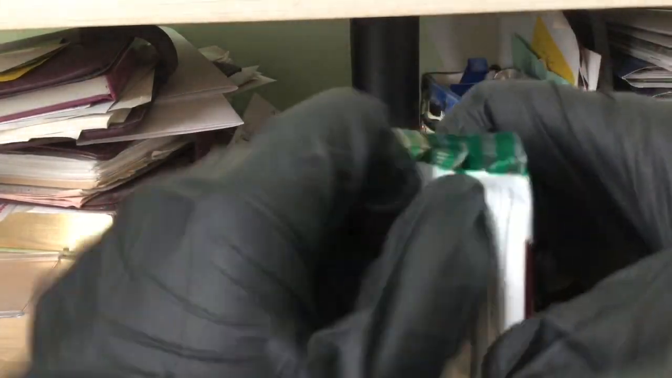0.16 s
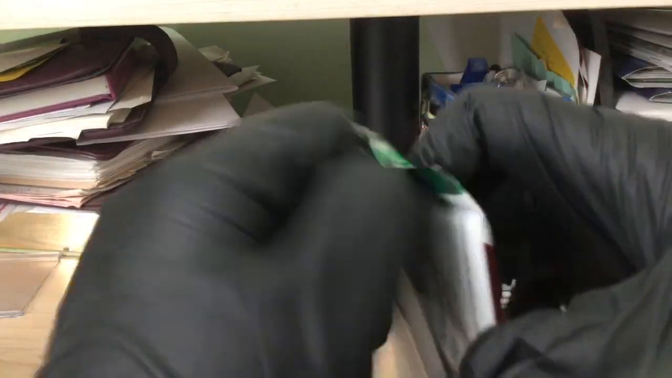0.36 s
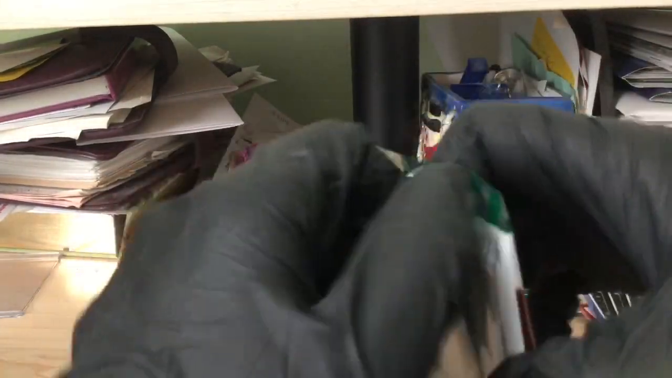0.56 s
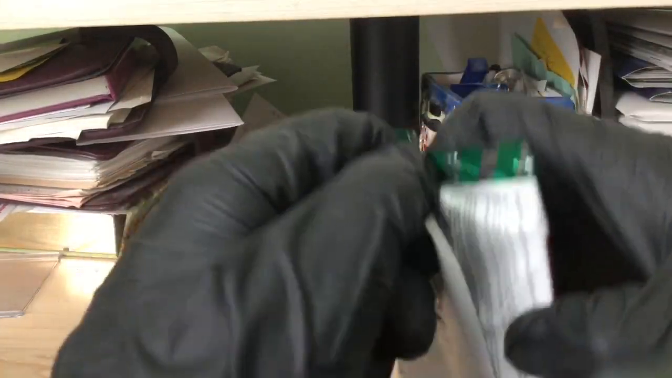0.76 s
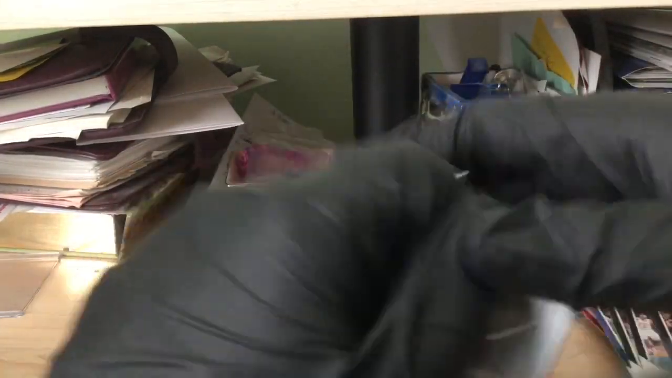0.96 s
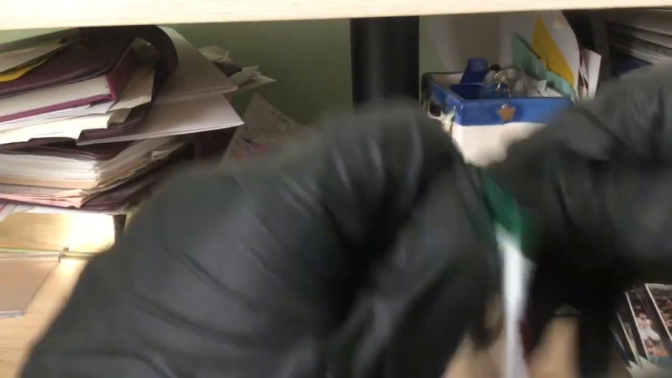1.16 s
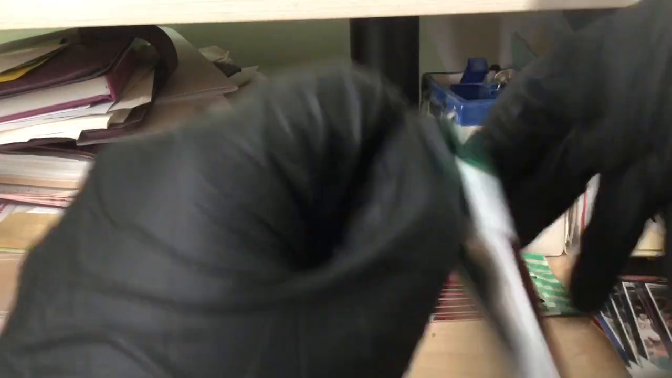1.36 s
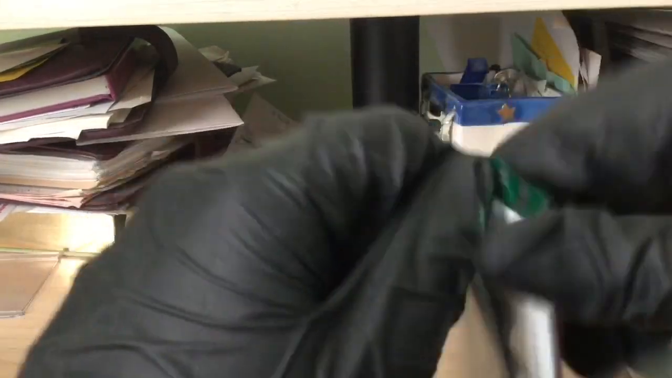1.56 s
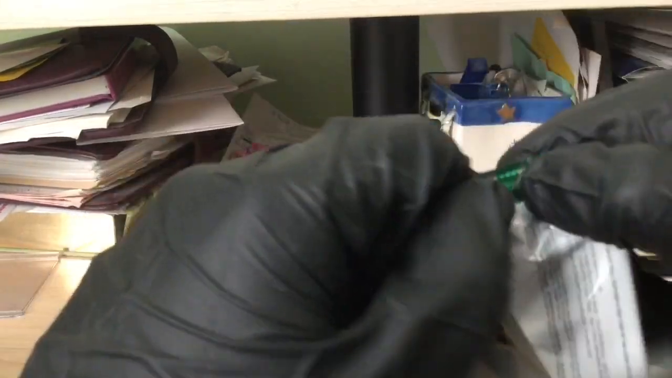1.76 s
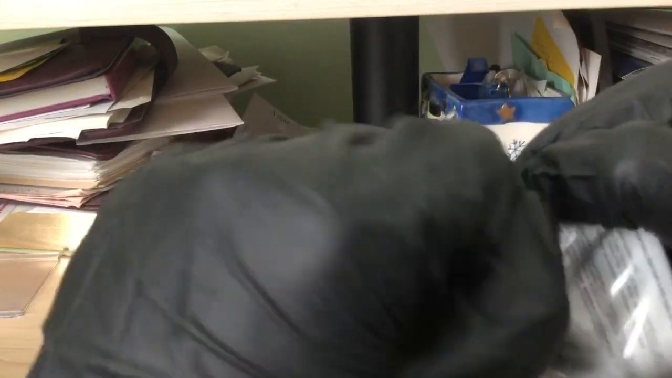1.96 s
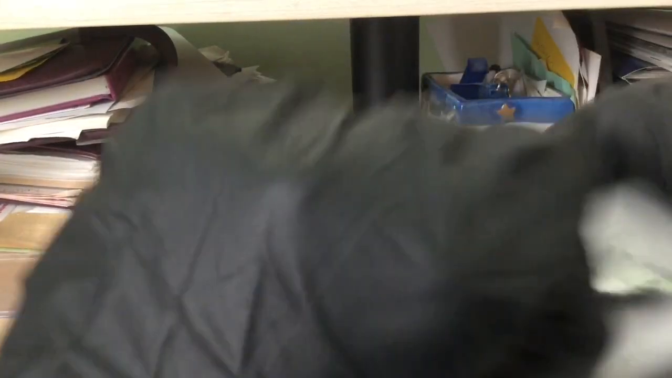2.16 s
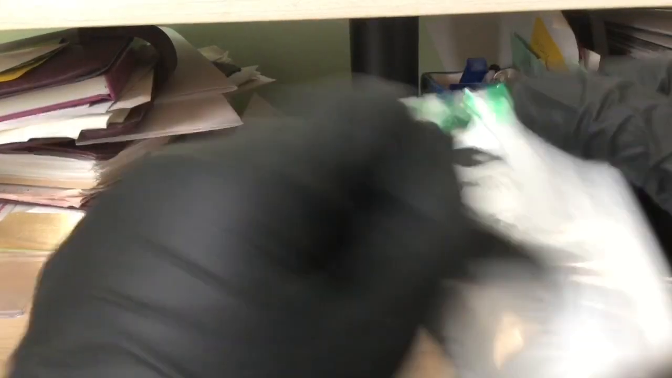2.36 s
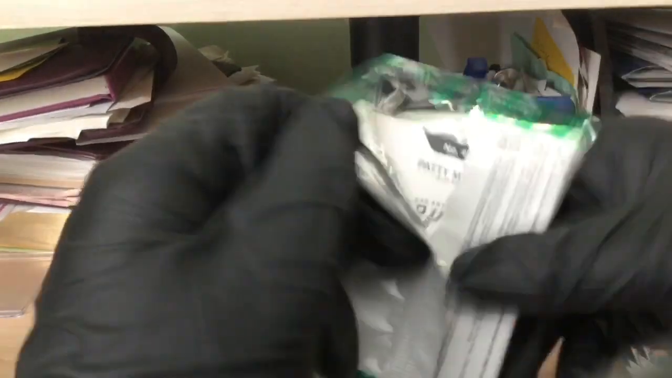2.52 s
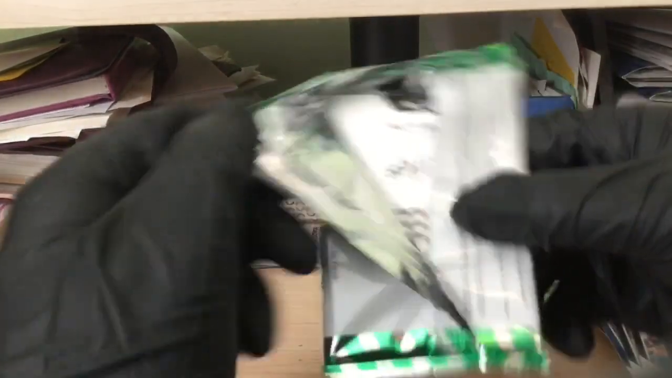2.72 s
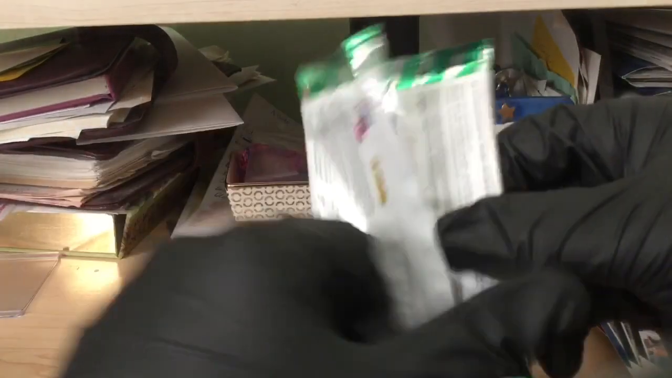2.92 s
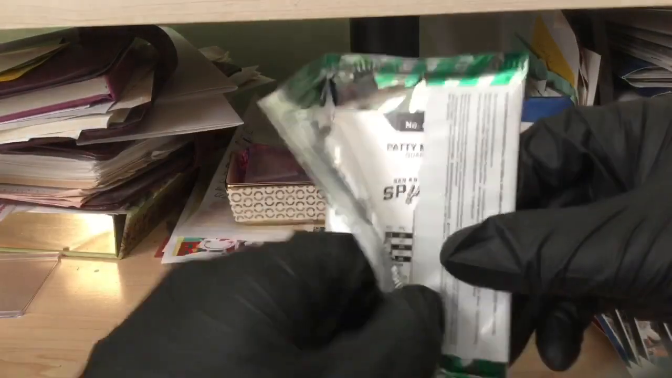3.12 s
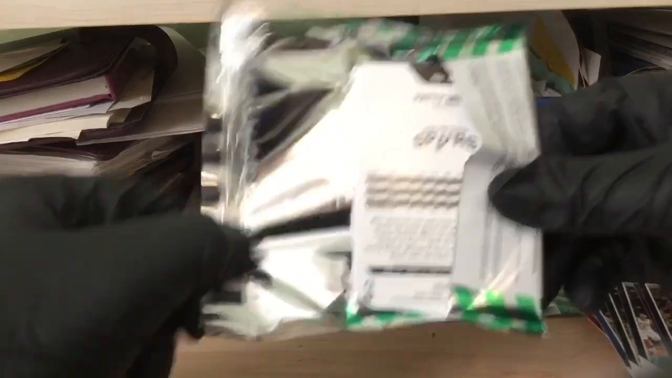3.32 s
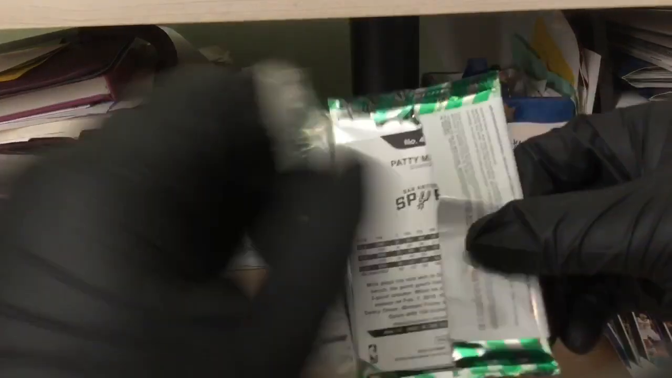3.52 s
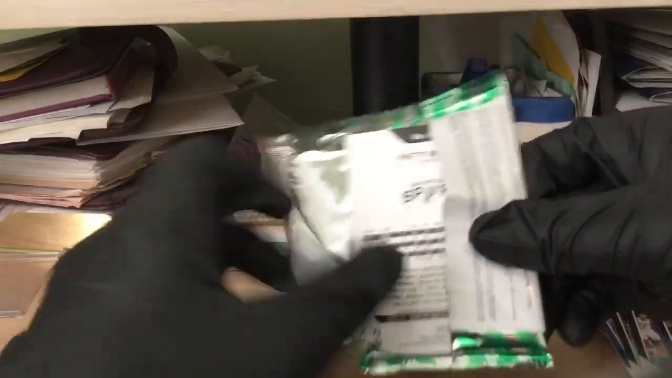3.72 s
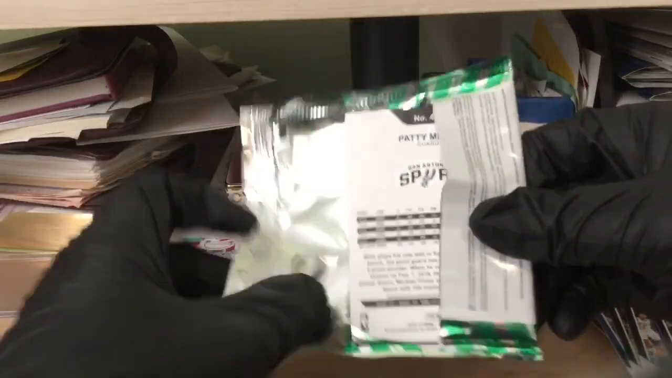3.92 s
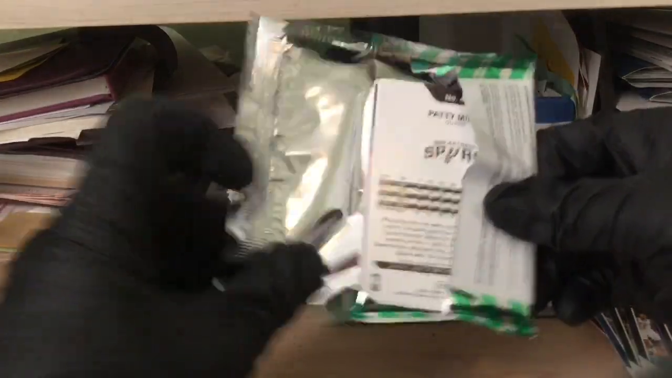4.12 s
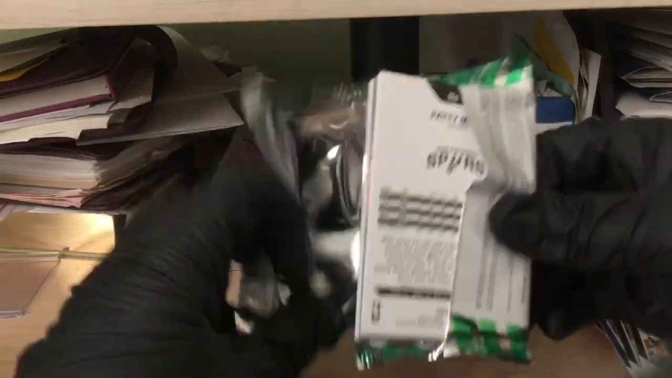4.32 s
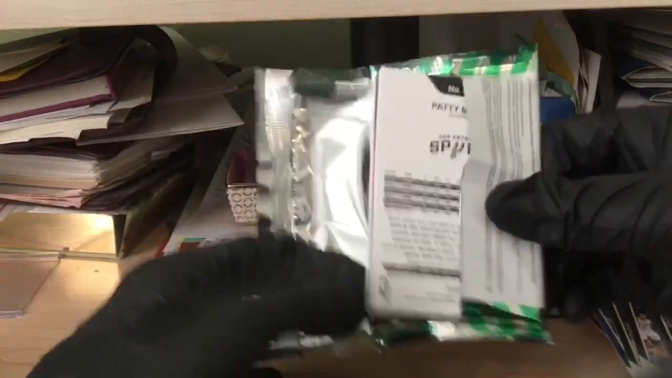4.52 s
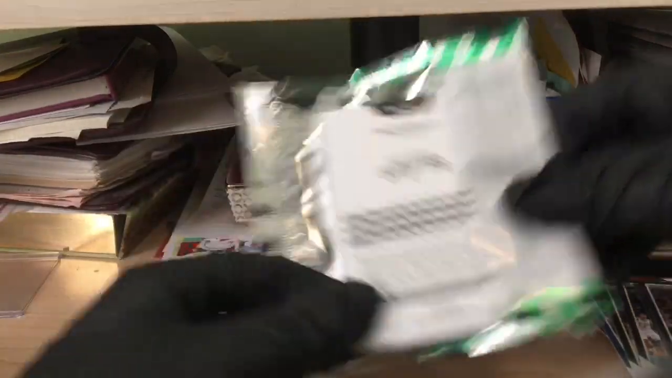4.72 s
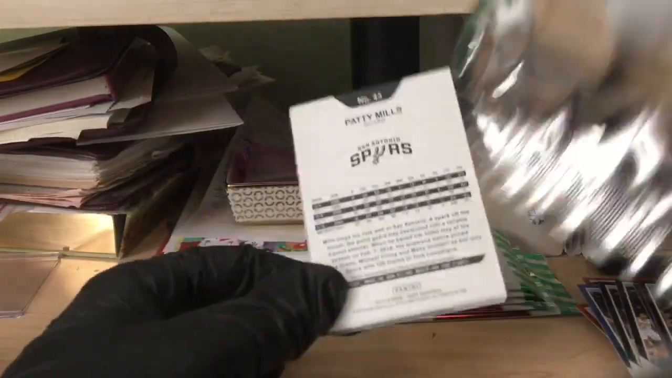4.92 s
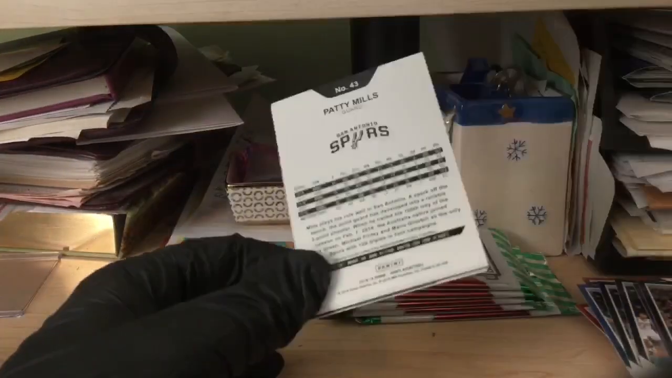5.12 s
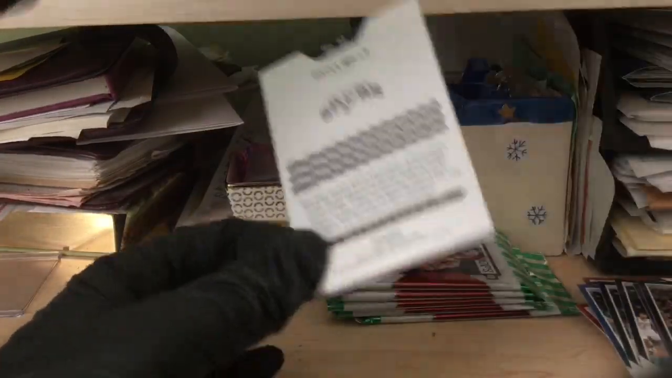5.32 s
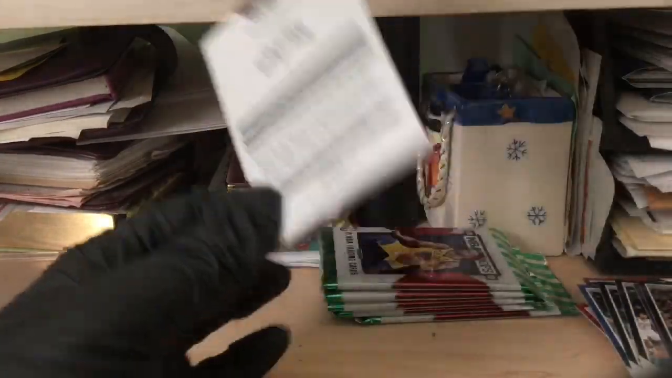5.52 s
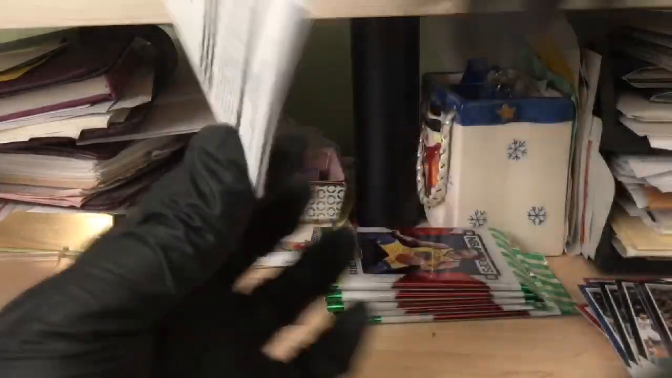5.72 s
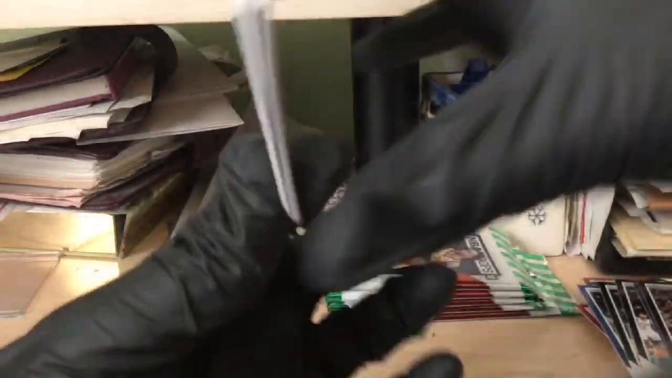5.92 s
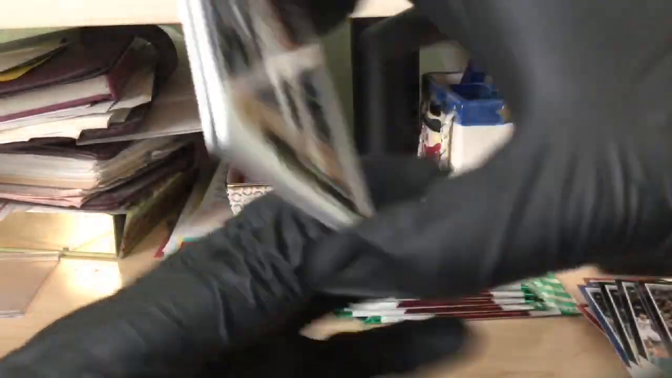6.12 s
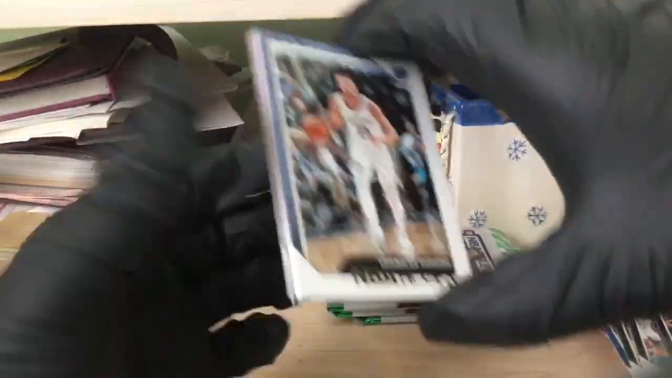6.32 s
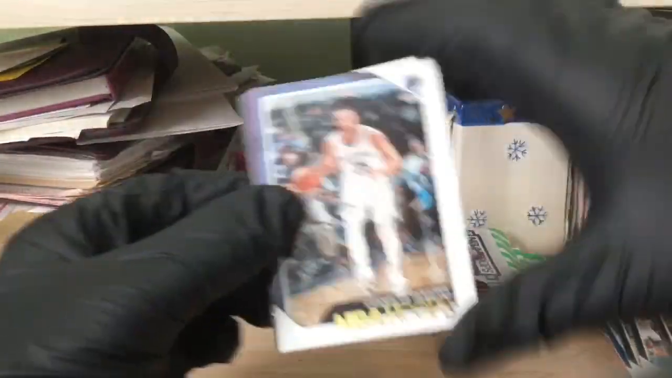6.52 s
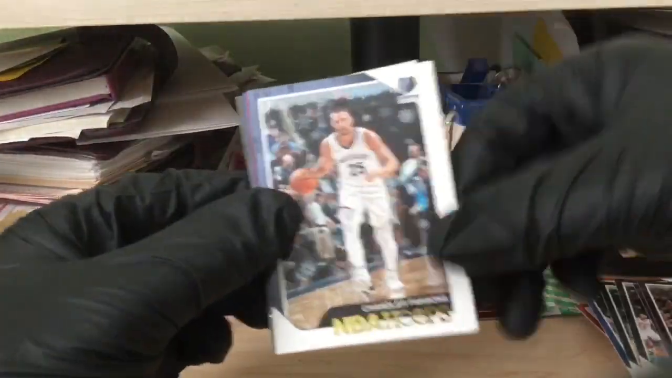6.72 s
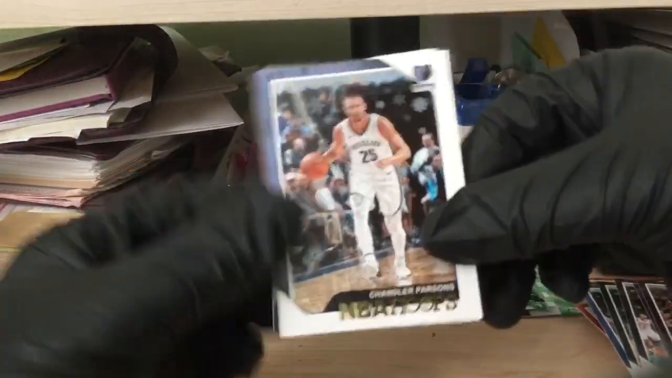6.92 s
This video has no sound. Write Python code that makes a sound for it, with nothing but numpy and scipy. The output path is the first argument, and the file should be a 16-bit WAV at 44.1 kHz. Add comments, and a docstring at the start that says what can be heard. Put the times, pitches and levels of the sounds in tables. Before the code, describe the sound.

Close foil wrapper crinkles and snaps in fingers, the seam cracks and rips open, more crumpling follows, then cards slide faintly in a quiet room.

```python
"""Gloved hands open a foil pack of trading cards close to the microphone, at a desk in a small room.
The film crinkles as fingers pinch the seam: clumps of noise scrapes ring facets, and creases snap singly.
Then the seam gives with a crack, a puff of air (a filtered pulse) and a short rip (a dense run of scrapes).
The wrapper is peeled and pulled off, crinkling and hissing; finally the cards slide softly and click.
A desk bounce and a short tail follow the pack; steady coloured noise lies beneath."""
import sys
import numpy as np
from scipy import signal
from scipy.fft import rfft, irfft
from scipy.io import wavfile
from scipy.ndimage import uniform_filter1d

SR = 44100
rng = np.random.default_rng(int(sys.argv[2]) if len(sys.argv) > 2 else 0)


def dump_mix(stems):
    """Bounce the given channels to the path in sys.argv[1] as a 16-bit WAV at rate SR."""
    frames = np.atleast_2d(stems).T  # one column per channel
    limited = np.clip(frames, -1, 1)  # hard clip at full scale
    pcm = np.round(limited * 32767).astype(np.int16)
    wavfile.write(sys.argv[1], SR, pcm)


N = 311787
TIME = np.arange(N) / SR
WRAPPER_GONE_S = 5.7
SNAP_LEAD_S = .005   # a buckle starts this long before its crack

# colour of tiny film facets: [f/Hz, level/dB]
FILM_COLOUR = [(4500, -21), (5800, -10), (7500, -10.5), (10000, -7), (12400, -2.5), (13800, -7),
               (15500, -15), (17000, -32.5)]
# colour of the wider panels between creases: [f/Hz, level/dB]
PANEL_COLOUR = [(600, -10), (1050, -3), (1700, -3), (2400, -2), (3000, -5), (4200, -5.5), (5400, -13.5),
                (7500, -34)]
# colour of the whole pouch: [f/Hz, level/dB]
POUCH_COLOUR = [(70, -26), (150, -13), (260, 7), (440, -7), (570, 3), (850, -6), (1300, -14.5)]


def handling():
    """How hard film, panels and gloves are worked: squeezes, power-summed with the steady grip."""
    # pinches and pulls of the fingers: [start t/s, hold t/s, film level/dB, panel level/dB, glove level/dB]
    squeezes = [(.02, 0.081, -42, -48.5, -70), (.15, 0.086, -48, -51.5, -63),
                (.325, 0.059, -42, -45.5, -72), (.428, 0.068, -33, -40.5, -54), (.561, .01, -41, -48, -49),
                (.602, .035, -40, -46.5, -49.5), (.69, 0.041, -45, -44.5, -51),
                (.762, 0.057, -39, -45, -45), (.985, .025, -46, -48.5, -48), (1.12, 0.066, -50, -46, -65),
                (1.212, 0.023, -33, -49, -62), (1.435, 0.024, -54, -42, -39), (1.55, 0.023, -54, -49, -51),
                (1.705, 0.028, -43, -42, -48), (1.87, 0.11, -46, -53, -68),
                (2.14, 0.014, -55.5, -55, -56.5), (2.217, 0.011, -54.5, -48, -55),
                (2.3, 0.12, -41, -47, -66), (2.54, 0.073, -52.5, -50.5, -64),
                (2.66, 0.047, -53, -49.5, -56), (2.78, 0.077, -51, -50, -50),
                (2.905, 0.051, -42.5, -45.5, -57), (3.137, 0.097, -45.5, -47.5, -73),
                (3.265, .025, -44, -43.5, -48), (3.302, 0.064, -26, -27.5, -41),
                (3.392, 0.025, -27.5, -27, -26.5), (3.45, 0.029, -39.5, -42.5, -35.5),
                (3.525, 0.054, -50, -48, -43.5), (3.72, 0.016, -38, -37, -43.5),
                (3.775, 0.029, -48, -44, -44.5), (3.847, .03, -51, -48.5, -55), (3.977, 0.1, -39, -40, -57),
                (4.18, 0.064, -63, -50.5, -38), (4.292, 0.094, -38.5, -37.5, -46),
                (4.447, 0.066, -38, -37, -40), (4.545, 0.082, -46.5, -44.5, -49.5),
                (4.72, 0.024, -53.5, -50, -44), (4.82, 0.079, -49.5, -49, -52),
                (5.035, 0.037, -48, -46.5, -48), (5.145, 0.067, -57.5, -59, -47.5),
                (5.26, 0.007, -59.5, -47.5, -46)]
    # grip between squeezes: [t/s, rustle level/dB, glove level/dB]
    grip = [(0, -55, -80), (.8, -55.5, -60), (.92, -64, -68), (1.35, -58, -46), (1.64, -64.5, -58.5),
            (1.8, -56, -62), (2.15, -68, -65), (2.42, -52, -68), (2.53, -60, -61), (3.05, -63.5, -69),
            (3.45, -52, -53.5), (3.66, -64, -55.5), (3.95, -64, -49.5), (4.4, -49, -38.5), (4.69, -63, -56),
            (4.92, -53.5, -46.5), (5.3, -81, -53.5), (5.5, -75.5, -62.5), (5.56, -86, -46),
            (5.7, -89.5, -62)]
    # the foil loads quickly and relaxes more slowly
    film, panel, glove = strokes(squeezes, rise_db_per_s=1404, fall_db_per_s=400.5)
    rustle, rub = gains(grip)
    return np.hypot(film, rustle), np.hypot(panel, rustle), np.hypot(glove, rub)


def crinkle(film, panel, glove, body_db=-8.0):
    """Harder working makes more and louder buckles; the gloves rub and bump underneath."""
    # colour of the gloves: [f/Hz, level/dB]
    glove_colour = [(25, -25.5), (50, -4), (75, 2.5), (130, -2), (250, 2.5), (380, 6), (600, -31.5)]
    per_s = 600 * (film / from_db(-43) + 0.00071) ** .25
    ticks = film * crackle(per_s, 1.9, FILM_COLOUR, 6500, 16000, q=5.6, even_s=0.011, rub=16.0)
    flaps = panel * crackle(.7 * per_s, 3.8, PANEL_COLOUR, 770, 4500, q=3.7, even_s=0.025, rub=2.0)
    body = panel * crackle(.5 * per_s, 3.5, POUCH_COLOUR, 220, 900, q=4, even_s=.015, rub=2.2)
    rumble = glove * crackle(400, 4.0, glove_colour, 60, 320, q=3, even_s=0.08, rub=1.5)
    return ticks + flaps + from_db(body_db) * body + rumble


def snaps(rows):
    """Creases buckle: small facets tick high and briefly, panels and pouch ring lower and longer."""
    out = np.zeros(N)
    film_h, panel_h, pouch_h = response(FILM_COLOUR), response(PANEL_COLOUR), response(POUCH_COLOUR)
    for s, film_db, panel_db, pouch_db, panel_hz in rows:
        film = buckle(film_h, rng.uniform(8500, 13500), q=4.3, crack_s=0.00048, plain=0.55)
        slowness = 3 ** rng.random()   # some creases flip at once, others roll over
        panel = buckle(panel_h, panel_hz, q=3.6, crack_s=0.00028 * slowness, plain=0.099)
        pouch = buckle(pouch_h, rng.uniform(220, 850), q=2, crack_s=0.00028, plain=1.2)
        snap = from_db(film_db) * film + from_db(panel_db) * panel + from_db(pouch_db) * pouch
        add(out, s - SNAP_LEAD_S, snap)
    return out


def small_snaps(film, panel, pouch_db=-11, panel_db=-4, count=240):
    """Lesser creases give way at random, louder where the foil is worked harder; rows for snaps()."""
    over_crinkle_db, spread_db, max_db = 5.5, 7.5, -31.5
    chance, scatter = rng.random((count, 2)), rng.standard_normal((count, 2))
    rows = []
    for (when, pitch), deviation in zip(chance, scatter):
        s = when * WRAPPER_GONE_S
        at = int(s * SR)
        worked_db = 20 * np.log10(np.array([film[at], panel[at]]) + 1e-9)
        high_db, low_db = np.minimum(worked_db + over_crinkle_db + spread_db * deviation, max_db)
        rows.append((s, high_db, low_db + panel_db, low_db + pouch_db, 1100 * 3 ** pitch))
    return rows


def rip():
    """The seam lets go in a fast run of tiny slips."""
    # tear running down the seam: [t/s, film level/dB, panel level/dB]
    tear_curve = [(2.222, -79, -44.5), (2.232, -26.5, -25), (2.236, -25, -21), (2.246, -19.5, -26.5),
                  (2.274, -23, -18.5), (2.297, -24, -24.5), (2.307, -31, -27), (2.32, -70, -70)]
    # colour of the tear: [f/Hz, level/dB]
    tear_colour = [(250, -15.5), (600, -7), (1200, 1.5), (2100, -2.5), (2800, -12.5), (4000, -13.5),
                   (5500, -17), (8000, -40)]
    film, panel = gains(tear_curve)
    shreds = crackle(1300, 1.7, FILM_COLOUR, 5200, 14500, q=1.9, even_s=0.005, rub=.6, grain_s=0.00025)
    seam = crackle(1000, 2.3, tear_colour, 1900, 3700, q=6.4, even_s=0.0065, rub=.6, grain_s=.0003)
    return film * shreds + panel * seam


def puffs(edge=6.0, port_hz=44, breadth=1.7, size=4096):
    """A pressure pulse, softer-edged when slower, which the microphone's bass cut turns into a swing."""
    # air pushed out as the pouch jerks or a hand bumps: [t/s, peak level/dB, f/Hz]
    air_pushes = [(.493, -14, 261), (1.234, -14, 189.2), (1.438, -46, 202), (2.2384, -7.5, 64),
                  (3.39, -15, 172.8), (3.405, -25, 70), (4.234, -47, 210), (4.457, -22, 188.6),
                  (5.085, -27.5, 97.1), (5.194, -25.5, 94.8), (5.397, -37, 45), (5.426, -35, 50.8)]
    out = np.zeros(N)
    for s, peak_db, hz in air_pushes:
        pulse_band = signal.butter(1, [hz / breadth, hz * breadth], "band", fs=SR)
        pulse = signal.lfilter(*pulse_band, signal.unit_impulse(size))
        swing_band = signal.butter(3, [port_hz, port_hz + edge * hz], "band", fs=SR, output="sos")
        swing = signal.sosfilt(swing_band, pulse)
        add(out, s, -from_db(peak_db) * swing / np.abs(swing).max())
    return out


def slip():
    """Smooth film sliding: slips so many and so small that they merge into a hiss."""
    # wrapper sliding through the fingers and off the cards: [start t/s, hold t/s, level/dB]
    slides = [(1.205, 0.019, -36), (1.255, 0.23, -49), (3.72, .015, -45.5), (4.825, 0.057, -42.5),
              (5.04, 0.019, -42.5)]
    # colour of the sliding film: [f/Hz, level/dB]
    slide_colour = [(700, -8), (2400, 0), (3800, -9), (5200, -15), (12000, -5.5)]
    speed, = strokes(slides, rise_db_per_s=343, fall_db_per_s=411)
    hiss = rms_one(through(rng.standard_normal(N), response(slide_colour)))
    return speed * hiss * from_db(0.5 * slow_chance(160))


def cards():
    """Fine friction of card on card, and their edges clicking."""
    # cards sliding as the stack is turned over: [start t/s, hold t/s, scuff level/dB, hiss level/dB]
    card_slides = [(5.533, 0.0064, -44.5, -43.5), (5.578, 0.023, -45.5, -48), (5.644, 0.013, -56.5, -55.5),
                   (5.865, 0.036, -71, -69), (6.076, .012, -62.5, -79.5), (6.22, 0.0073, -56, -60.5),
                   (6.5, 0.0094, -70, -73.5), (6.57, .05, -74, -70.5), (6.82, 0.0063, -80.5, -82.5),
                   (6.975, 0.0056, -64, -62.5), (7.055, .015, -66, -65.5)]
    # card edges clicking: [t/s, level/dB, f/Hz]
    edge_taps = [(5.405, -52.5, 1482), (5.423, -51, 2176), (5.542, -37.5, 2480), (5.6456, -41, 3080),
                 (6.077, -49, 1267), (6.113, -59.5, 1400), (6.233, -53, 1518), (6.769, -60, 2090),
                 (6.822, -59, 2300), (6.834, -59, 2180)]
    # colour of the cards: [f/Hz, level/dB]
    card_colour = [(350, 1.5), (800, -4.5), (2100, -1), (3200, -0.5), (5300, -9.5), (8000, -16)]
    held = from_db(-81) * (TIME > WRAPPER_GONE_S)   # the bare stack rubs faintly in the hand
    press, slide = strokes(card_slides, rise_db_per_s=1204, fall_db_per_s=454.5) + held
    scuff = crackle(1500, 3.8, card_colour, 840, 5530, q=16, even_s=0.015, rub=1.5)
    hiss = crackle(1800, 2.75, FILM_COLOUR, 5300, 13700, q=3.1, even_s=0.035, rub=0.91)
    out = press * scuff + slide * hiss
    card_h = response(card_colour)
    for s, tap_db, hz in edge_taps:
        add(out, s - SNAP_LEAD_S, from_db(tap_db) * buckle(card_h, hz, q=4, crack_s=.0004, plain=.3))
    return out


def crackle(per_s, spread_db, colour, low_hz, high_hz, q, even_s, rub, grain_s=0.00038, count=12):
    """Clumps of tiny scrapes, each ringing one facet, over film rubbing; facets come and go as it bends."""
    born = rng.random(N) < per_s * from_db(4 * slow_chance(70)) / SR
    sizes = born * from_db(spread_db * np.minimum(rng.exponential(1, N), 4))
    facet = rng.integers(0, count, N)[np.cumsum(born)]   # kept until the next scrape
    grain, span = max(int(grain_s * SR), 2), max(int(even_s * SR), 2)
    push = np.sqrt(smooth(sizes ** 2, grain) + rub * per_s / SR) * rng.standard_normal(N)
    rings = 0.14 * push
    for k, hz in enumerate(np.geomspace(low_hz, high_hz, count)):
        rings = rings + resonate(push * (facet == k), hz, q) * from_db(7.2 * slow_chance(25))
    x = through(rings, response(colour))
    return x / np.sqrt(smooth(x ** 2, span) + 1e-12)   # the hand keeps the mean level near 1


def buckle(h, hz, q, crack_s, plain, size=2048):
    """A crease creaks, flips with a crack that rings a facet, and shivers to rest; rms 1 over 5 ms."""
    t = np.arange(size) / SR - SNAP_LEAD_S
    away = np.abs(t) * np.where(t < 0, 1.5, 1)   # the build-up is quicker than the decay
    shiver = from_db(-19) * np.exp(-away / .0028)
    push = rng.standard_normal(size) * (np.exp(-away / crack_s) + shiver)
    sound = through(plain * push + resonate(push, hz, q), h[:size])
    return sound / np.sqrt(np.sum(sound ** 2) / (.005 * SR))


def strokes(rows, rise_db_per_s, fall_db_per_s):
    """Hand movements that swell, hold and relax; one gain in time for each dB column."""
    power = np.zeros((len(rows[0]) - 2, N))
    for start, hold, *db in rows:
        span = slice(max(int((start - .3) * SR), 0), int((start + hold + .5) * SR))
        t = TIME[span] - start
        shape_db = rise_db_per_s * np.minimum(t, 0) - fall_db_per_s * np.maximum(t - hold, 0)
        power[:, span] += from_db(np.array(db)[:, None] + shape_db) ** 2
    return np.sqrt(power)


def room(x, echo_db=-11, scatter_db=-13, scatter_s=0.0037):
    """A bounce off the desk combs the sound; the shelves scatter it; the room adds a faint tail."""
    desk_echo_s, t60_s, tail_db = .00337, 0.23, -21
    t = TIME[:SR]
    early = rng.standard_normal(SR) * np.exp(-t / scatter_s) * (t > .003)
    late = rng.standard_normal(SR) * from_db(-60 * t / t60_s) * (t > .008)
    walls = response([(100, -11.5), (500, 1.5), (2200, 4.0), (6000, 7.5), (14000, -9.0)])
    tail = through(late / np.linalg.norm(late), walls)
    delayed = np.interp(TIME - desk_echo_s, TIME, x, left=0)
    bounce = signal.lfilter([.6], [1, -.4], delayed)   # treble softened
    reflections = from_db(scatter_db) * early / np.linalg.norm(early) + from_db(tail_db) * tail
    return through(x, reflections) - from_db(echo_db) * bounce


def ambience(level_db=-55):
    """The quiet room: steady noise, strongest in the bass."""
    # colour of the room noise: [f/Hz, level/dB]
    room_colour = [(18, -36.5), (30, -13), (70, 2.5), (153, -2.5), (239, -12.5), (384, -15), (426, -25.5),
                   (1760, -34.5), (2830, -42), (7470, -46), (12600, -40), (14000, -49.5), (16000, -71.5)]
    return from_db(level_db) * through(rng.standard_normal(N), response(room_colour))


def from_db(db):
    """Decibels to gain."""
    return 10 ** (np.asarray(db) / 20)


def rms_one(x):
    """Scale to rms 1."""
    return x / np.sqrt(np.mean(x ** 2) + 1e-20)


def gains(rows):
    """The dB columns of a curve as gains in time, silent outside it."""
    s, *columns = np.transpose(rows)
    inside = (TIME >= s[0]) * (TIME <= s[-1])
    return [from_db(np.interp(TIME, s, db)) * inside for db in columns]


def add(track, s, sound):
    """Mix a short sound in at time s."""
    at = max(round(s * SR), 0)
    track[at:at + len(sound)] += sound[:N - at]


def response(points, size=4096):
    """Causal (minimum-phase) impulse response with the given colour and unit energy."""
    hz, db = np.transpose(points)
    log_f = np.log(np.maximum(np.arange(size // 2 + 1), .5) * SR / size)
    outside = np.abs(log_f - np.clip(log_f, np.log(hz[0]), np.log(hz[-1])))
    log_gain = np.log(from_db(np.interp(log_f, np.log(hz), db))) - 2 * outside   # falls off past the ends
    cepstrum = irfft(log_gain)
    cepstrum[1:size // 2] *= 2
    cepstrum[size // 2 + 1:] = 0
    h = irfft(np.exp(rfft(cepstrum)))
    return h / np.linalg.norm(h)


def smooth(power, span):
    """Triangular running mean."""
    return np.abs(uniform_filter1d(uniform_filter1d(power, span), span))


def through(x, h):
    """Filter by an impulse response."""
    return signal.fftconvolve(x, h)[:len(x)]


def resonate(x, hz, q):
    """A resonance with gain 1 on top."""
    return signal.lfilter(*signal.iirpeak(min(hz, .4 * SR), max(q, 1), fs=SR), x + 1e-18)


def slow_chance(per_s, size=2048):
    """A smooth random wander of rms 1."""
    return rms_one(np.interp(TIME * per_s, np.arange(size), rng.standard_normal(size)))


def scene():
    """The pack close up, its reflections, and the quiet room."""
    # loud creases buckling: [t/s, film level/dB, panel level/dB, pouch level/dB, panel f/Hz]
    loud_creases = [(.0286, -23.5, -32, -57.5, 2300), (.0567, -22.5, -27.5, -63, 2470),
                    (.0811, -28, -32.5, -41.5, 2450), (.0996, -33, -47, -65, 3020),
                    (.1504, -33, -39, -43.5, 1620), (.1754, -34, -51, -62, 1780),
                    (.281, -37.5, -53, -69, 2160), (.319, -31, -34, -58, 4200),
                    (.354, -30, -51, -38.5, 2670), (.374, -25.5, -42, -51, 1600),
                    (.3902, -29, -45, -60, 1700), (.476, -44, -30, -57, 2820),
                    (.4922, -16, -24, -25.5, 1650), (.5211, -33, -47, -63, 1900),
                    (.5645, -22.5, -34.5, -39, 2550), (.5987, -19, -31, -32.5, 1600),
                    (.6213, -31.5, -40, -46, 1700), (.677, -32, -48, -56, 2300),
                    (.7088, -28.5, -41, -40, 2350), (.7736, -18.5, -26.5, -31.5, 2350),
                    (.7874, -20.5, -27.5, -61, 1600), (.8196, -24, -24.5, -32, 865),
                    (.8612, -36.5, -38, -44, 1170), (1.001, -24.5, -35, -44, 2670),
                    (1.1193, -27.5, -33, -61, 2200), (1.2249, -46, -20.5, -47, 2000),
                    (1.233, -21.5, -18, -28.5, 1930), (1.277, -31.5, -39, -46, 2200),
                    (1.573, -37, -42, -65, 2470), (1.668, -39.5, -45, -53, 1500),
                    (1.7206, -36, -34.5, -41.5, 1080), (1.7596, -29.5, -38, -66, 3540),
                    (1.772, -35, -34.5, -60, 1990), (1.8416, -31.5, -38.5, -42.5, 1490),
                    (1.9016, -21.5, -23.5, -67, 2920), (1.9534, -31.5, -39.5, -48.5, 2320),
                    (2.1035, -39.5, -38.5, -52, 2140), (2.226, -24.5, -22, -37.5, 3950),
                    (2.2354, -12, -29, -28, 1570), (2.2379, -11.5, -13, -9.5, 1620),
                    (2.2955, -26, -27.5, -26, 2300), (2.3603, -32, -30, -67, 4080),
                    (2.3734, -27, -31.5, -50, 1470), (2.395, -22.5, -32.5, -60, 4030),
                    (2.4462, -53, -38, -48, 910), (2.5372, -44, -30.5, -46, 3450),
                    (2.5589, -30, -36, -35, 900), (2.5698, -32, -33.5, -40, 1200),
                    (2.6982, -33, -24, -37.5, 1150), (2.7708, -41.5, -43, -34.5, 915),
                    (2.7975, -35, -55, -58, 1001), (2.8409, -30, -41, -48, 1440),
                    (2.8933, -29.5, -32, -57, 2010), (2.9134, -28, -34.5, -34.5, 2200),
                    (2.9573, -24, -35.5, -46, 1600), (3.1327, -35, -45.5, -75, 1410),
                    (3.1968, -27, -32, -56, 2440), (3.2236, -28.5, -36.5, -44, 2100),
                    (3.262, -27.5, -46.5, -43, 1900), (3.3216, -30.5, -24.5, -37.5, 2000),
                    (3.34, -23, -22.5, -20, 1000), (3.3532, -20.5, -27.5, -34.5, 1100),
                    (3.3921, -11.5, -16, -24, 2180), (3.3965, -35, -16.5, -17.5, 1209),
                    (3.406, -22.5, -22, -25, 1400), (3.419, -20.5, -18, -19, 1214),
                    (3.4689, -39, -36.5, -36, 990), (3.5632, -31, -51, -48, 1110),
                    (3.5794, -33.5, -29.5, -29.5, 1110), (3.773, -31, -36.5, -40, 3280),
                    (3.9705, -35, -33.5, -54, 2310), (3.9885, -49, -30.5, -40, 1200),
                    (4.0005, -30, -48, -55, 2400), (4.0104, -34, -25, -35.5, 1280),
                    (4.0205, -27, -29.5, -32, 1290), (4.0388, -23, -23.5, -38, 2360),
                    (4.0716, -30, -23, -24.5, 1310), (4.0909, -35, -27.5, -31, 1560),
                    (4.2308, -28.5, -32, -26.5, 2740), (4.311, -23, -30.5, -36, 2200),
                    (4.3721, -22.5, -26.5, -29.5, 2560), (4.4563, -19, -25, -25, 2750),
                    (4.4863, -31, -46, -42, 2500), (4.5559, -28.5, -49, -58, 1200),
                    (4.7174, -33.5, -40, -48, 1270), (4.847, -38, -33.5, -44, 1340),
                    (4.869, -33.5, -33.5, -39.5, 1200), (4.8863, -36.5, -38.5, -42.5, 1410),
                    (5.147, -43, -52, -66, 2300), (5.167, -40, -36, -41, 890),
                    (5.1902, -40, -32.5, -33.5, 1100), (5.2167, -44, -68, -64.5, 2300)]
    film, panel, glove = handling()
    creases = snaps(loud_creases) + snaps(small_snaps(film, panel))
    pack = crinkle(film, panel, glove) + creases + rip() + slip() + cards()
    return (pack + room(pack) + puffs() + ambience())[None]


def record(dry):
    """The loudest cracks overload; the top is cut."""
    clipped = np.clip(dry, -.9, .9)
    low_pass = signal.ellip(10, .2, 70, 16300, fs=SR, output="sos")   # cutoff in Hz
    return signal.sosfilt(low_pass, clipped)


dry = scene()
out = record(dry)
dump_mix(out)
```